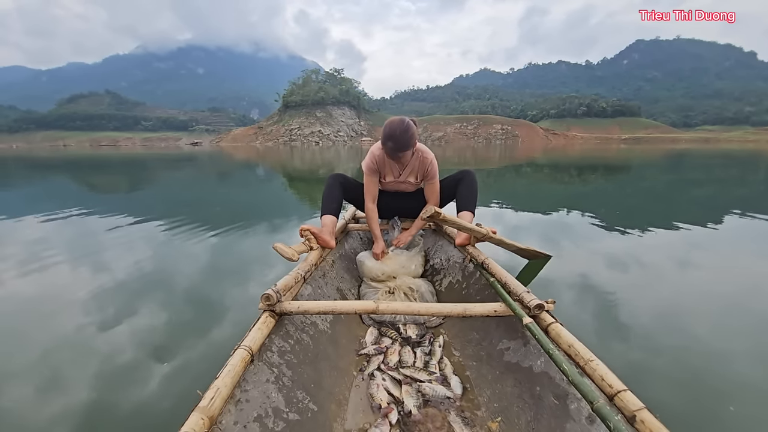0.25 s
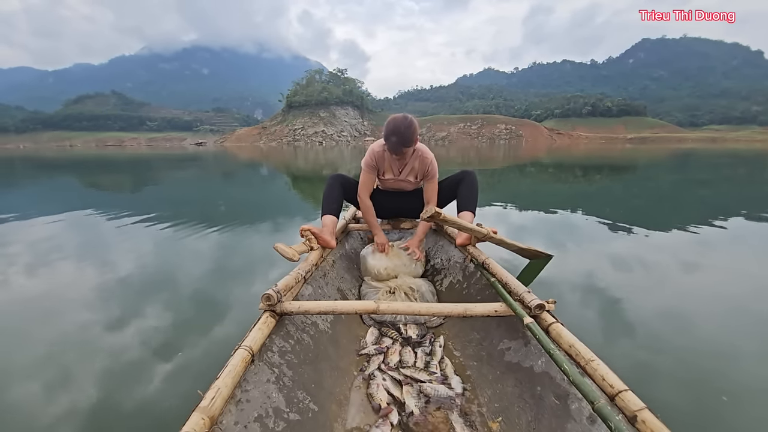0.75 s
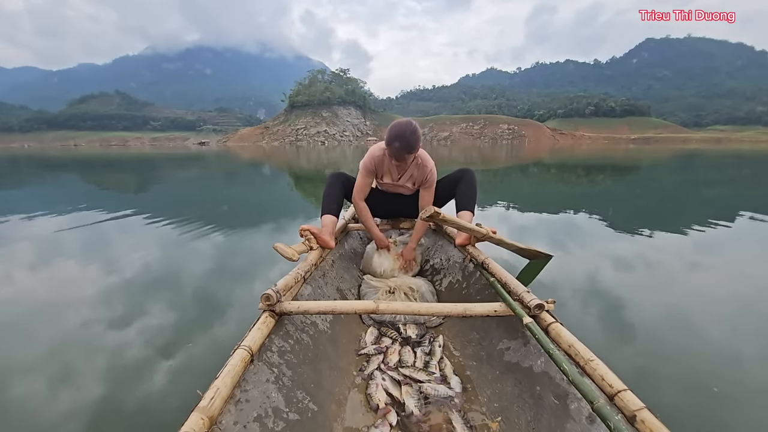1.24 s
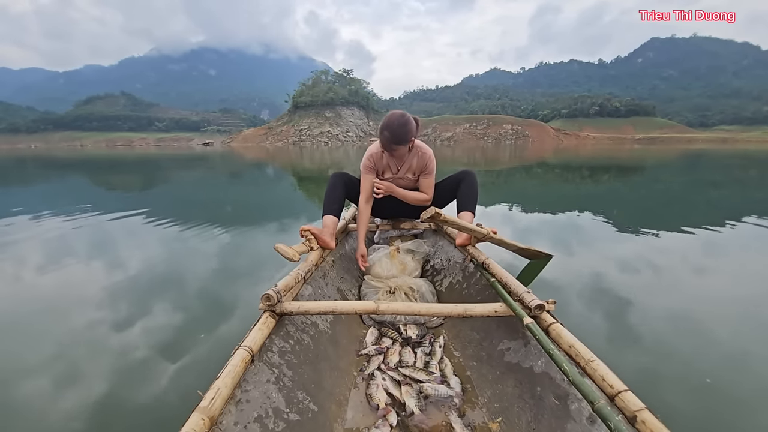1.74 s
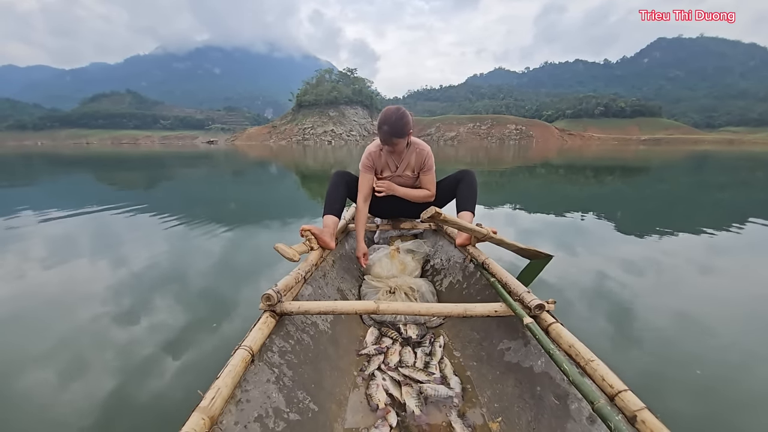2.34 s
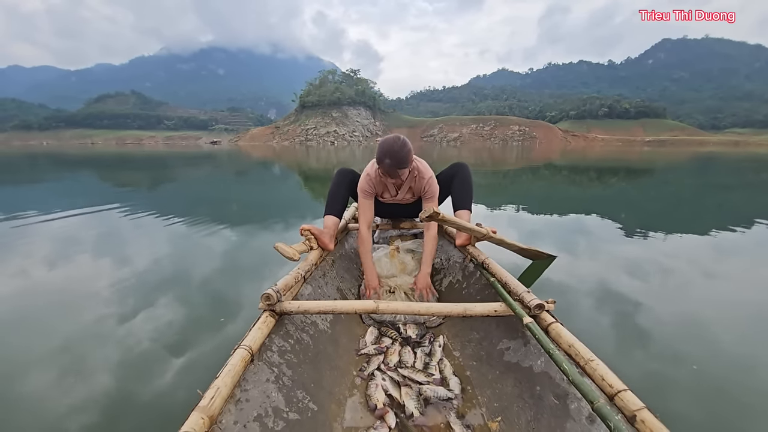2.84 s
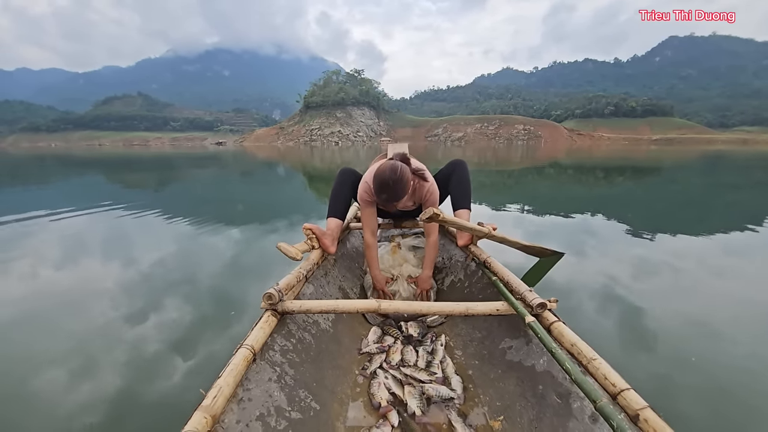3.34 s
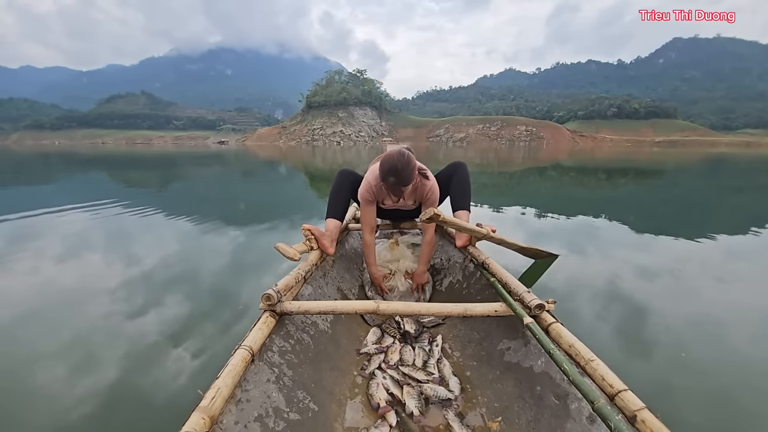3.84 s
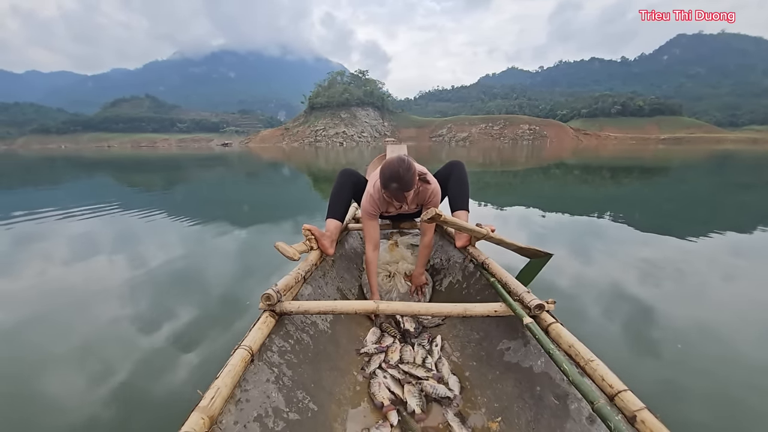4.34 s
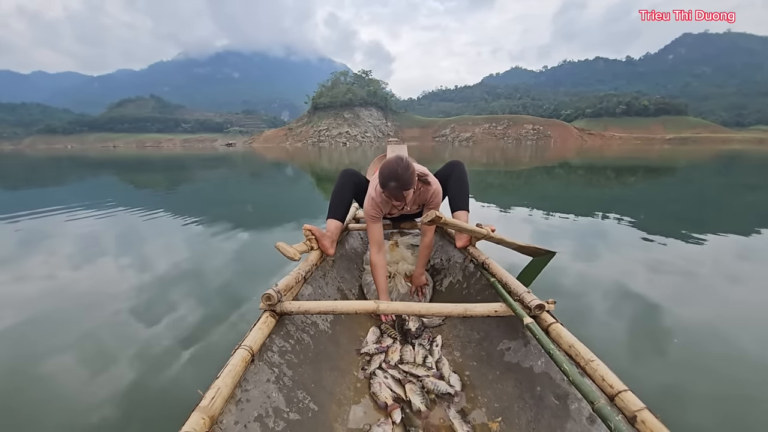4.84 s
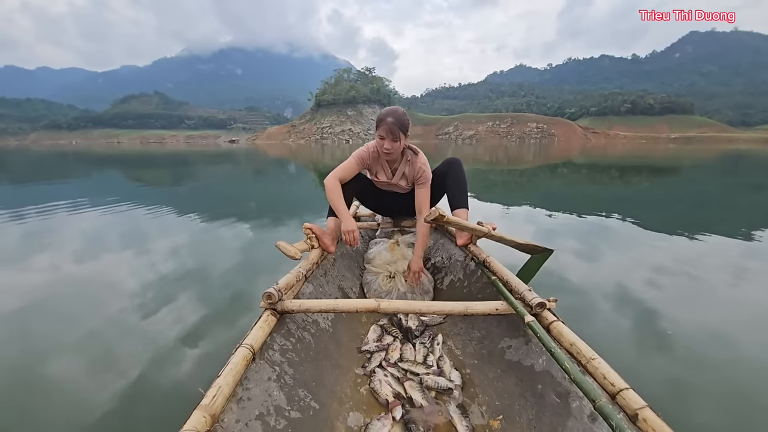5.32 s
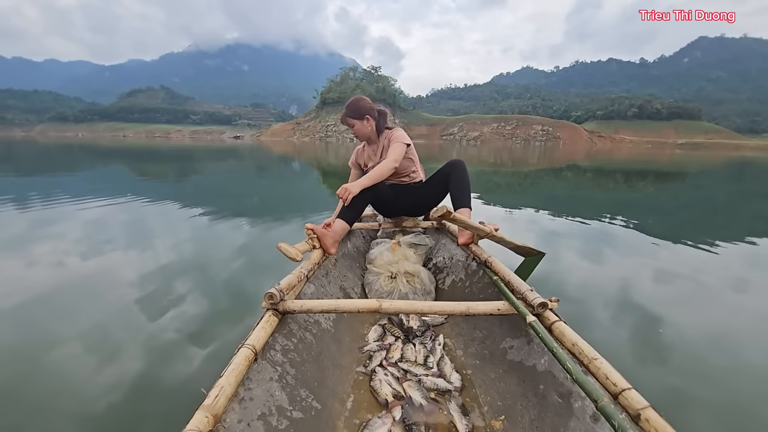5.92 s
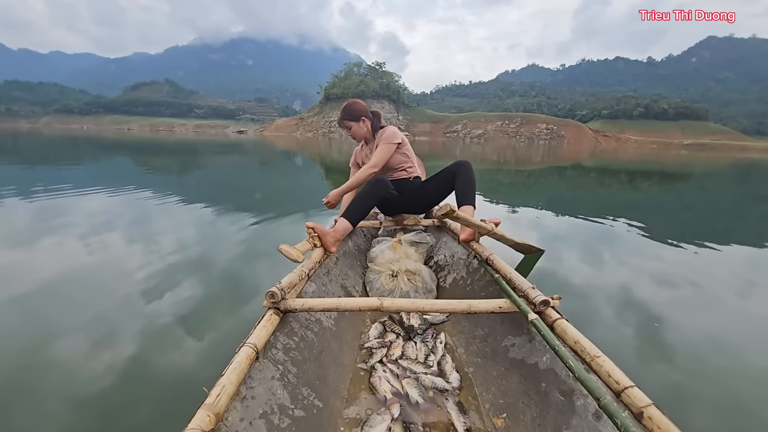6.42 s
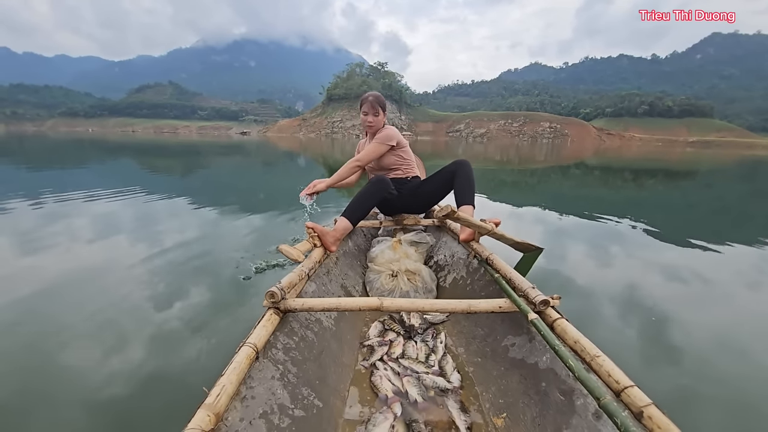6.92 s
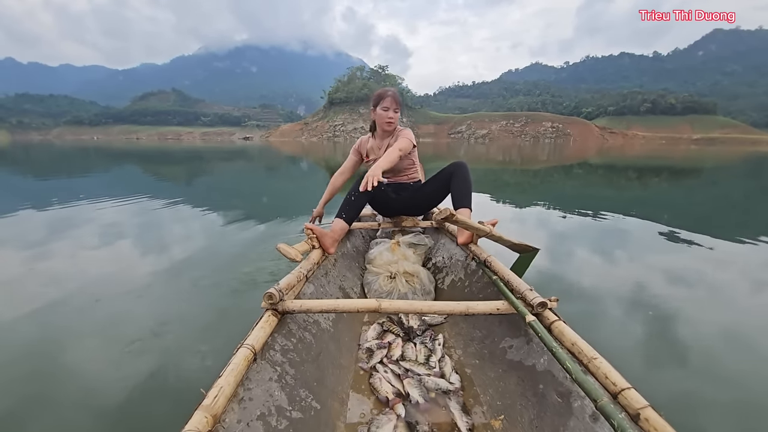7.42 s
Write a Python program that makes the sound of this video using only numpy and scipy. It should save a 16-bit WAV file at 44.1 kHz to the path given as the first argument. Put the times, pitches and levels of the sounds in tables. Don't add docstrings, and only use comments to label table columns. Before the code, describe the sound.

Stereo microphones near the hull catch soggy mesh crackling with short jerks, wood knocks and bubbling water, strongest early on. After a lull the net is turned again more gently, leaving scattered drips and tiny plops. Near the end fine droplets spatter off to the left as hands are rinsed. The calm outdoor lake is quiet, with high steady crickets, far engine thuds, a low motor drone and a few barely audible bird notes.

```python
import sys
import numpy as np
from scipy import signal
from scipy.fft import rfft, irfft, next_fast_len
from scipy.io import wavfile
from scipy.ndimage import uniform_filter1d

SR = 44100
rng = np.random.default_rng(int(sys.argv[2]) if len(sys.argv) > 2 else 0)


def ratio_of_db(decibels):
    return 10 ** (np.asarray(decibels, float) / 20)


def materialize(psi):
    bounded = np.clip(np.atleast_2d(psi).T, -1, 1)
    quanta = np.round(bounded * 32767).astype(np.int16)
    wavfile.write(sys.argv[1], SR, quanta)


N = 338247


def evened(x):
    return x / np.sqrt(np.mean(x ** 2) + 1e-20)


def read(points, hz):
    f, value = np.transpose(points)
    return np.interp(np.log(hz + 1), np.log(f + 1), value)


def add(mix, s, sound):
    part = mix[..., round(s * SR):][..., :sound.shape[-1]]
    part += sound[..., :part.shape[-1]]


def drift(hz):
    step = int(SR / hz / 2)
    return np.interp(np.arange(N), np.arange(N // step + 2) * step, rng.standard_normal(N // step + 2))


def envelope(rows, column, rise_db_per_s, fall_db_per_s):
    steepen_s = 0.093
    t, power = np.arange(N) / SR, np.zeros(N)
    for row in rows:
        start, length = row[:2]
        early, late = np.maximum(start - t, 0), np.maximum(t - start - length, 0)
        early = early * (1 + early / steepen_s)
        late = late * (1 + late / steepen_s)
        power += ratio_of_db(2 * (row[column] - rise_db_per_s * early - fall_db_per_s * late))
    return uniform_filter1d(np.sqrt(power), 300)


def coloured(x, spectrum, peaks=()):
    hz, z = np.fft.rfftfreq(len(x), 1 / SR), rfft(x)
    flat = z / np.sqrt(uniform_filter1d(abs(z) ** 2, 1500) + 1e-9)
    resonance_db = sum(d / (1 + (2 * (hz - f) / w) ** 2) for f, w, d in peaks)
    return evened(irfft(flat * ratio_of_db(read(spectrum, hz) + resonance_db), len(x)))


def grains(lo_hz, hi_hz, cycles, per_s, spread_db, rise, sizes=16):
    size = next_fast_len(N)
    when, kind, luck = rng.random(size), rng.integers(0, sizes, size), rng.exponential(1, size)
    train = (when < per_s / SR) * ratio_of_db(spread_db * np.minimum(luck, 4))
    out = np.zeros(size)
    for k, hz in enumerate(np.geomspace(lo_hz, hi_hz, sizes)):
        u = np.arange(int(3 * cycles * SR / hz) + 8) * hz / SR / cycles
        tone = np.sin(2 * np.pi * cycles * (u + rise * u ** 2)) * u ** .5 * np.exp(-2 * u)
        out += signal.oaconvolve(train * (kind == k), tone / np.linalg.norm(tone))[:size]
    return out


def pulled(column):
    # (start [s], length [s], mesh level [dB], moved water level [dB], weight on the boards [dB])
    pulls = [(0, 0.035, -65.5, -62, -60.5), (.08, 0.08, -58, -59.5, -63), (.17, 0.022, -54.5, -50.5, -50),
             (.24, 0.015, -60.5, -56, -52), (.3, .03, -54, -51.5, -46.5), (.35, 0.066, -55, -54, -49.5),
             (.47, 0.042, -61, -57.5, -58), (.585, 0.073, -57, -55.5, -55.5), (.74, 0.22, -53.5, -52, -45),
             (.92, 0.075, -52, -46.5, -43.5), (1.07, 0.075, -51.5, -29.5, -33),
             (1.15, 0.11, -49, -26, -35.5), (1.31, 0.087, -53, -47, -41), (3.02, 0.014, -58, -47, -60),
             (3.055, 0.046, -48.5, -43, -46), (3.15, 0.088, -60.5, -50.5, -52),
             (3.28, 0.13, -57.5, -47, -49), (3.41, 0.079, -54, -40, -41.5), (3.52, 0.14, -53, -35.5, -38.5),
             (3.765, 0.12, -63, -51, -51.5), (3.89, 0.12, -57, -49.5, -54.5),
             (5.075, 0.038, -79.5, -55, -51.5), (5.14, 0.027, -67, -59.5, -70),
             (5.2, 0.072, -60.5, -53.5, -56.5)]
    return envelope(pulls, column, rise_db_per_s=243, fall_db_per_s=159)


def net():
    # (frequency [Hz], level [dB per Hz])
    mesh = [(530, -14), (900, -11), (1610, -7), (2170, -10), (2540, -13.5), (3000, -10.5), (7320, -15.5),
            (10300, -29.5), (11500, -22), (15500, -25.5)]
    fibres_per_s, fibre_db = 140, 14
    fizz = evened(grains(736, 16300, cycles=1.1, per_s=16000, spread_db=3.3, rise=0.02))
    luck = rng.random((len(fizz), 2))
    flicks = (luck[:, 0] < fibres_per_s / SR) * ratio_of_db(fibre_db + 11.0 * luck[:, 1] ** 3)
    crackle = coloured(fizz + np.diff(flicks, prepend=0), mesh)[:N]
    clumps = ratio_of_db(0.74 * drift(40))
    return evened(crackle * clumps) * pulled(column=2) * ratio_of_db(7.5)


def slosh():
    # (frequency [Hz], level [dB per Hz])
    water = [(210, -27), (350, -8.5), (779, -4.5), (917, -14.5), (1060, -11.5), (2200, -32.5), (2570, -54),
             (3500, -38), (4550, -61.5), (7700, -120)]
    # (frequency [Hz], width [Hz], level [dB])
    hull = [(531, 49, 4.5), (793, 93, -5), (1021, 65, 3.5), (2215, 290, 17)]
    # (frequency [Hz], level [dB per Hz])
    boards = [(60, -39), (110, -13), (200, -0.5), (260, 2), (330, -13), (450, -11), (800, -34.5)]
    gurgle = grains(300.8, 3645, cycles=4.98, per_s=1500, spread_db=1.2, rise=0.1385)
    gurgle = coloured(gurgle, water, hull)[:N]
    rub = grains(81.1, 568, cycles=2.93, per_s=500, spread_db=3.24, rise=0.026)
    rub = coloured(rub, boards)[:N]
    jolts_db = drift(50)
    gurgle = evened(gurgle * ratio_of_db(2.0 * jolts_db)) * pulled(column=3) * ratio_of_db(-3.0)
    return gurgle + evened(rub * ratio_of_db(jolts_db)) * pulled(column=4) * ratio_of_db(-1.15)


def air():
    # (frequency [Hz], level [dB per Hz])
    hush_colour = [(20, -33), (60, 10), (170, -4.5), (330, -2), (800, -13), (1100, -18), (2500, -26),
                   (4200, -20), (5600, -20.5), (6600, -39.5), (8600, -40.5), (10000, -52.5), (16000, -37)]
    # (frequency [Hz], likeness [-1 to 1])
    likeness = [(60, 1), (180, 0.79), (550, 0.071), (1650, -0.27), (4970, -0.099), (15000, 0.27)]
    # (frequency [Hz], spread [Hz], level [dB])
    choruses = [
        (4635, 76, -70),
        (7480, 184, -86.5),
    ]
    frames, hz = N // 256 + 5, np.fft.rfftfreq(1024, 1 / SR)
    a, b, c, d, patches = rng.standard_normal((frames, 513, 5)).T
    patches = evened(uniform_filter1d(uniform_filter1d(patches, 10, 0), 14, 1))
    same = np.clip(read(likeness, hz), -1, 1)[:, None]
    left = a + 1j * b
    z = np.array([left, same * left + np.sqrt(1 - same ** 2) * (c + 1j * d)])

    def shaped(gain):
        return evened(signal.istft(z * gain, nperseg=1024, noverlap=768)[1][:, :N])

    gusts_db = 1.6 * patches
    out = ratio_of_db(-62) * shaped(ratio_of_db(read(hush_colour, hz)[:, None] + gusts_db))
    for f, spread_hz, db in choruses:
        band = np.exp(-((hz[:, None] - f) / spread_hz) ** 2 / 4)
        out = out + ratio_of_db(db + 0.72 * drift(8.8)) * shaped(band)
    return out


def singers():
    # (lowest pitch [Hz], phrase start [s], phrase length [s])
    crickets = [(4510, .62, .885), (4545, .66, .885), (4575, .58, .885), (4610, .64, .885), (4530, .3, .97),
                (4570, .85, 1.1), (4520, .5, .8)]
    climb_hz, climb_share = 105, 0.72
    t, out = np.arange(N) / SR, np.zeros((2, N))
    for low_hz, start, length in crickets:
        climb = (1 + signal.sawtooth(2 * np.pi * (t - start) / length, climb_share)) / 2
        pitch_hz = low_hz + climb_hz * uniform_filter1d(climb, 4000) + 8 * drift(4) + 12 * drift(30)
        turns = np.cumsum(pitch_hz) / SR
        lag = rng.uniform(0, 2 * np.pi, (2, 1))
        out += ratio_of_db(2.7 * drift(5) + 1.16 * drift(25)) * np.sin(2 * np.pi * turns + lag)
    return ratio_of_db(-65) * evened(out)


def engine():
    # (time [s], firings [per s], level [dB])
    pace = [
        (0, 13, -57),
        (1.5, 13.8, -60.5),
        (4, 13.9, -59.5),
        (6.6, 12.4, -60.5),
        (7.67, 10, -71.5),
    ]
    # (multiple of the firing rate, level [dB])
    exhaust = [(1, -19), (2, -31.5), (3, -26), (4, -2), (5, 2), (6, 1.5), (7, -5), (8, 3), (9, -3),
               (10, -1.5), (11, -7.5), (12, -8.5), (13, -18)]
    s, per_s, db = np.transpose(pace)
    t, thud = np.arange(N) / SR, np.zeros(N)
    turns = np.cumsum(np.interp(t, s, per_s)) / SR
    for k, overtone_db in exhaust:
        blur = drift(6.6)
        thud += ratio_of_db(overtone_db + 3.4 * drift(11.0)) * np.cos(2 * np.pi * k * turns + blur)
    return evened(thud) * ratio_of_db(np.interp(t, s, db) - 0.5)


def tick(db, hz, hiss, last_s, width):
    t = np.arange(len(hiss)) / SR
    band = np.clip([hz / (1 + width), hz * (1 + width)], 100, .45 * SR)
    decay = np.exp(-t / last_s) + 0.29 * np.exp(-t / last_s / 6)
    burst = hiss * decay * np.minimum(t / 0.0006, 1)
    burst = signal.sosfilt(signal.butter(2, band, "band", fs=SR, output="sos"), burst)
    burst += 3.2 * signal.lfilter(*signal.iirpeak(hz, 6.0, SR), burst)
    return ratio_of_db(db) * burst / abs(burst).max() * np.linspace(1, 0, len(t))


def bubble(db, hz, cycles, rise, swell=0.058):
    u = np.arange(int(.1 * SR)) / SR * hz / cycles
    tone = np.sin(2 * np.pi * cycles * (u + rise * u ** 2))
    return ratio_of_db(db - 60 * u) * np.minimum(u / swell, 1) * tone


def plop(db, hz, froth_db, chance, hiss):
    out = np.zeros(int(.16 * SR))
    add(out, 0, bubble(db + 7.0, .93 * hz, cycles=36, rise=0.39, swell=0.072))
    for late, size, weak in chance:
        small_hz = hz * (0.743 + 1.45 * size)
        add(out, 0.047 * late, bubble(db + froth_db - 8 * weak, small_hz, cycles=24, rise=0.59, swell=0.13))
    add(out, 0, tick(db + froth_db - 2, 1.48 * hz, hiss, last_s=0.038, width=0.75))
    return out


def sides(s, luck):
    scatter_db, rinse_s, rinse_left_db = 2.5, 6.7, 4
    left_db = scatter_db * luck + rinse_left_db * (s > rinse_s)
    return ratio_of_db(np.array([[.5], [-.5]]) * left_db)


def drops():
    # (time [s], peak level [dB], pitch [Hz])
    glugs = [(0.297, -39.5, 280), (0.515, -50, 280), (0.726, -50, 200), (0.839, -48, 253),
             (0.959, -33.5, 256.3), (1.076, -16, 444), (1.109, -17.5, 707), (1.134, -18, 602),
             (1.162, -14, 692), (1.199, -17.5, 798), (1.228, -13.5, 746), (1.272, -19.5, 545),
             (1.407, -43, 250), (1.543, -55, 253.5), (3.013, -37.5, 986), (3.407, -23, 637),
             (3.475, -31, 302), (3.555, -23.5, 655), (3.595, -25, 612), (3.632, -28.5, 273),
             (3.664, -30.5, 231), (3.672, -25.5, 734), (3.701, -34, 248.7), (3.932, -31, 660),
             (4.775, -54, 205), (5.069, -52, 235), (5.391, -39.5, 229)]
    # (time [s], peak level [dB], pitch [Hz], froth level [dB])
    plops = [(1.491, -56, 1330, 4), (2.353, -52.5, 910, -1), (3.988, -40, 1445, -17), (4.05, -51, 920, -2),
             (4.117, -44, 720, -3), (4.556, -57, 841, 0), (4.627, -51.5, 1460, -17),
             (4.677, -56, 1500, -15), (4.769, -57, 1360, -2), (4.973, -57.5, 677, 3),
             (6.181, -53.5, 957, 3), (6.199, -59, 771, -1), (6.391, -48.5, 1460, 2),
             (6.403, -48.5, 822, 5.5), (6.508, -53, 1480, -6), (6.595, -47.5, 711, -25),
             (6.697, -51, 820, 7.5), (6.769, -53.5, 1065, -14), (6.928, -59, 1680, -8),
             (7.005, -60, 1020, -2), (7.046, -53.5, 820, 4), (7.198, -57.5, 1254, 9),
             (7.288, -66, 1170, -7)]
    # (time [s], peak level [dB], centre [Hz])
    slaps = [(0.2976, -40, 1470), (0.5708, -38.5, 2780), (0.743, -33.5, 1640), (0.879, -33, 1630),
             (1.2235, -21, 1400), (3.0154, -43, 1370), (3.247, -34.5, 2060), (3.3154, -42, 1340),
             (3.344, -35, 1380), (3.632, -35, 1420), (3.766, -53, 1560), (3.9947, -35, 2940),
             (4.027, -39, 2240), (5.0722, -46, 1600), (5.0957, -40, 2920), (5.1448, -43, 2270),
             (5.176, -38, 3680), (5.22, -32, 3480), (5.308, -43.5, 2400), (5.33, -45, 1560)]
    # (time [s], peak level [dB], centre [Hz])
    drips = [(1.512, -45, 1470), (1.551, -39, 2960), (1.758, -53, 3520), (2.351, -40, 2680),
             (4.1148, -39.5, 1310), (4.272, -49, 1670), (4.3588, -37, 3480), (4.404, -42.5, 3000),
             (4.467, -43, 1440), (4.5329, -45.5, 1960), (4.65, -44, 1570), (4.777, -39.5, 1720),
             (4.801, -36, 2180), (4.953, -46, 4200), (6.869, -39, 4800), (5.4086, -51.5, 2570),
             (5.4966, -50.5, 1970), (5.537, -51, 1522), (5.7164, -50, 3050), (5.7307, -52.5, 1596),
             (6.294, -51, 2130), (6.555, -51, 1326), (6.667, -44.5, 3990), (6.735, -43, 3640),
             (7.003, -36.5, 3640), (7.062, -39, 2120), (7.15, -44, 4030), (7.2103, -39.5, 3680)]
    # (time [s], peak level [dB], centre [Hz])
    snaps = [(0.072, -30, 11700), (0.657, -32, 5170), (0.745, -20.5, 6400), (0.8686, -18.5, 6160),
             (0.9467, -23, 7250), (1.099, -24, 5490), (1.25, -13, 6400), (1.3418, -19, 5300),
             (1.552, -40, 6400), (2.352, -47, 5200), (2.981, -47.5, 5220), (3.162, -26.5, 5350),
             (3.221, -25, 7200), (3.3442, -21.5, 5650), (3.4111, -32, 5270), (3.4337, -27, 5400),
             (3.7234, -32, 7200), (3.8847, -25, 6200), (4.065, -32.5, 5030), (4.4274, -48, 5330),
             (5.221, -24, 7500), (5.331, -33.5, 6100), (6.105, -46, 5740), (6.137, -49, 11400),
             (6.592, -30.5, 5000), (6.871, -54, 7240), (6.945, -24, 7700), (7.132, -39, 5600),
             (7.2244, -41, 7620), (7.3346, -33, 11700)]
    # (time [s], peak level [dB], centre [Hz])
    cracks = [(0.0337, -57, 7310), (0.0557, -43, 4900), (0.1058, -43, 5490), (0.4548, -41, 6420),
              (0.4862, -45, 5040), (0.576, -50, 5760), (0.612, -40, 5750), (0.711, -43, 5280),
              (0.7253, -39.5, 6400), (0.9744, -44, 5000), (1.0324, -37, 5620), (1.3063, -35, 5040),
              (3.0095, -45.5, 5330), (3.0358, -36.5, 5560), (3.181, -42, 7290), (3.2463, -40.5, 7600),
              (3.2771, -40, 5200), (3.315, -43, 5400), (3.3819, -37, 5160), (3.6522, -44, 6820),
              (3.769, -61, 7390), (3.7964, -55, 7130)]
    # (time [s], peak level [dB], centre / 1.35 [Hz])
    specks = [(1.8233, -56.5, 5130), (4.1929, -54, 5130), (4.2423, -63, 5030), (4.3899, -62, 5020),
              (4.5615, -62, 5390), (4.8374, -68, 5210), (4.9033, -56, 5830), (6.5571, -55, 7400),
              (6.579, -58.5, 5394), (6.6609, -56, 5200), (6.6928, -63, 8210), (6.757, -49, 6590),
              (6.7634, -42, 5810), (6.7804, -43, 7400), (6.8114, -54, 5030), (6.8563, -43.5, 5290),
              (6.8966, -53, 5020), (6.9102, -51, 7270), (6.967, -41, 5000), (7.0037, -55, 5110),
              (7.0244, -47, 7450), (7.061, -48, 5420), (7.1536, -49, 5000), (7.1592, -42, 5070),
              (7.2436, -54, 6700), (7.2904, -52, 11500)]
    # (time [s], peak level [dB], pitch [Hz])
    blips = [(2.185, -64.5, 3000), (2.665, -62, 2310), (4.203, -54, 2180), (4.21, -56, 940),
             (4.435, -62, 1150), (4.675, -55, 1200), (4.718, -61, 2900), (4.86, -59, 1490),
             (5.497, -56, 1000), (5.588, -59, 1580), (5.59, -60, 780), (5.61, -67, 1080),
             (5.731, -59.5, 1050), (6.154, -56, 3600), (6.17, -62, 3800), (6.188, -46.5, 1451),
             (6.235, -62, 1590), (6.414, -47, 825), (6.45, -56, 776), (6.455, -60, 2400),
             (6.748, -55, 1350), (6.812, -60, 2050), (6.853, -56, 3280), (6.87, -59, 1070),
             (6.908, -61, 1490), (6.922, -56, 1460), (6.982, -63, 1700), (7.075, -46, 3780)]
    out = np.zeros((2, N))
    for s, db, hz in glugs:
        add(out, s, bubble(db + 1.0, hz, cycles=35, rise=0.11, swell=.09))
    for s, db, hz, froth_db in plops:
        chance, hiss = rng.random((4, 3)), rng.standard_normal(2000)
        add(out, s, plop(db, hz, froth_db, chance, hiss) * sides(s, hiss[0]))
    for s, db, hz in slaps + drips:
        hiss = rng.standard_normal(1600)
        add(out, s, tick(db, hz, hiss, last_s=0.0023, width=1.06) * sides(s, hiss[0]))
    for s, db, hz in snaps:
        add(out, s, tick(db - 8.0, hz, rng.standard_normal(600), last_s=0.00044, width=1.2))
    for s, db, hz in cracks:
        add(out, s, tick(db + 4.0, hz, rng.standard_normal(600), last_s=0.0011, width=0.89))
    for s, db, hz in specks:
        hiss = rng.standard_normal(600)
        add(out, s, tick(db, 1.35 * hz, hiss, last_s=0.0006, width=1.3) * sides(s, hiss[0]))
    for s, db, hz in blips:
        ring = bubble(db + 3.0, hz, cycles=29, rise=0.1, swell=0.073)
        add(out, s, ring * sides(s, rng.standard_normal()))
    return out


def whistle(rows, waver, octave_db):
    s, hz, db = np.transpose(rows)
    t = np.arange(s[0], s[-1], 1 / SR)
    turns = np.cumsum(np.interp(t, s, hz)) / SR + waver * drift(23)[:len(t)]
    fade = np.minimum(np.minimum(t - s[0], s[-1] - t) / 0.0037, 1)
    tone = np.sin(2 * np.pi * turns) + ratio_of_db(octave_db) * np.sin(np.pi * turns)
    flutter = ratio_of_db(3.1 * drift(40)[:len(t)])
    return s[0], np.sqrt(2) * ratio_of_db(np.interp(t, s, db)) * fade * tone * flutter


def motor():
    # (time [s], pitch [Hz], level [dB])
    drone = [(1.5, 160.8, -75.5), (2.9, 160, -69), (4, 155.6, -64.5), (4.7, 146.8, -64.5),
             (5.3, 148.1, -64), (5.55, 147.7, -61), (5.75, 143.4, -62.5), (6.4, 139.4, -64.5),
             (7.67, 140.5, -68.5)]
    # (multiple of the firing rate, level [dB])
    pulses = [(8, -12), (11, -8), (13, -12), (15, -12.5), (18, -15.5), (22, -17), (30, -25.5)]
    s, hz, db = np.transpose(drone)
    t, comb = np.arange(N) / SR, np.zeros(N)
    turns = np.cumsum(np.interp(t, s, hz)) / SR / 5
    multiple, pulse_db = np.transpose(pulses)
    for k in range(8, 31):
        strength = ratio_of_db(np.interp(k, multiple, pulse_db) + 3.9 * drift(4.1))
        comb += strength * np.cos(2 * np.pi * k * turns + .4 * drift(4))
    out = comb * ratio_of_db(np.interp(t, s, db) - 3.5)
    add(out, *whistle(drone, waver=0.017, octave_db=-27))
    return out


def birds():
    # (start [s], length [s], first pitch [Hz], last pitch [Hz], level [dB])
    calls = [(1.995, 0.021, 3050, 3900, -78), (2.033, 0.058, 3340, 2560, -80),
             (2.407, 0.031, 1400, 1390, -77), (2.455, .03, 3150, 3480, -77), (2.45, 0.054, 3780, 3850, -82),
             (2.504, .06, 3350, 2570, -81), (2.54, 0.097, 1325, 1320, -78), (2.742, 0.095, 1640, 1670, -69),
             (2.745, 0.065, 670, 612, -67), (2.76, 0.023, 3100, 3300, -81),
             (2.788, 0.092, 1800, 1730, -71.5), (2.83, .04, 1670, 1650, -72), (2.91, 0.11, 3200, 2950, -76),
             (4.151, 0.17, 1395, 1397, -72), (4.335, 0.088, 1380, 1340, -77)]
    out = np.zeros(N)
    for start, length, first_hz, last_hz, db in calls:
        top_hz = first_hz + 0.71 * (last_hz - first_hz)
        glide = [(start, first_hz, db - 10), (start + 0.41 * length, top_hz, db),
                 (start + length, last_hz, db - 10)]
        add(out, *whistle(glide, waver=0.21, octave_db=-5.5))
    return out


def running(column):
    # (start [s], length [s], spray level [dB], trickle level [dB])
    runoff = [(4.1, 0.013, -73, -64.5), (4.2, 0.05, -86, -73), (4.36, 0.18, -78, -69),
              (4.63, 0.053, -95, -74), (4.8, 0.0072, -74, -57.5), (4.89, 0.057, -74.5, -69.5),
              (6.37, 0.17, -81, -78), (6.57, 0.033, -68.5, -63), (6.74, 0.049, -60, -64),
              (6.85, 0.05, -67.5, -76), (6.97, 0.062, -58.5, -72), (7.08, 0.095, -64, -86),
              (7.24, 0.16, -69, -86), (7.55, 0.09, -77.5, -89)]
    return envelope(runoff, column, rise_db_per_s=125, fall_db_per_s=96)


def spray():
    # (frequency [Hz], level [dB per Hz])
    droplets = [(590, -64), (1000, -13), (2620, -13.5), (4700, -4.5), (8740, -11), (9910, -31),
                (11400, -15), (15500, -18)]
    patter = grains(786, 16000, cycles=1.5, per_s=14000, spread_db=4.2, rise=0.069)
    patter = coloured(patter, droplets)[:N]
    clumps = ratio_of_db(1.9 * drift(30) + 2.6 * drift(250))
    return evened(patter * clumps) * running(column=2) * ratio_of_db(3.0)


def trickle():
    chirps = grains(577, 3780, cycles=7.8, per_s=900, spread_db=2.3, rise=.12)[:N]
    return evened(chirps) * running(column=3)


def boat(x, spots=6):
    # (frequency [Hz], likeness [0 to 1])
    likeness = [(60, 0.99), (180, 1), (550, 0.98), (1000, 0.83), (1650, 0.47), (4970, 0), (15000, 0)]
    size = next_fast_len(N + 4096)
    hz, t = np.fft.rfftfreq(size, 1 / SR), np.arange(1024) / SR
    same = np.clip(read(likeness, hz), 0, 1)
    spot = np.repeat(rng.integers(0, spots, N // 512 + 1), 512)[:N]
    decay = ratio_of_db(-60 * t / 0.0055) + .42 * ratio_of_db(-60 * t / 0.026)
    wet = 0
    for k in range(spots):
        echoes = rfft(rng.standard_normal((2, 1024)) * decay, size)
        echoes /= np.sqrt(uniform_filter1d(abs(echoes) ** 2, size=1500))
        here = np.sqrt(abs(uniform_filter1d(1. * (spot == k), 256)))
        wet = wet + rfft(x * here, size) * echoes
    return irfft(rfft(x, size) * np.sqrt(same) + np.sqrt(1 - same) * wet, size)[:, :N]


def scene():
    near = boat(net() + slosh() + drops() + spray() + trickle())
    far = engine() + motor() + birds()
    return near + far + air() + singers()


def band_limit(x):
    return signal.sosfilt(signal.butter(12, 16990, fs=SR, output="sos"), x)


def record(dry):
    # (frequency [Hz], difference [dB])
    lean = [(60, 0), (240, 1), (950, 1), (3770, 2.5), (15000, 2.5)]
    size = next_fast_len(N)
    hz = np.fft.rfftfreq(size, 1 / SR)
    half_db = read(lean, hz) / 2
    gain = ratio_of_db([half_db, -half_db]) * (hz < 15890)
    mix = irfft(rfft(dry, size) * gain, size)[:, :N]
    return band_limit(mix)


dry = scene()
out = record(dry)
materialize(out)
```